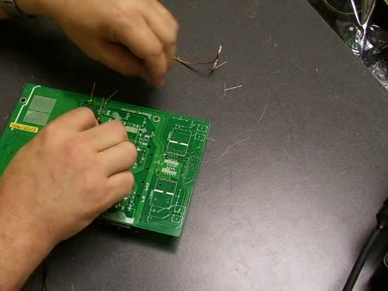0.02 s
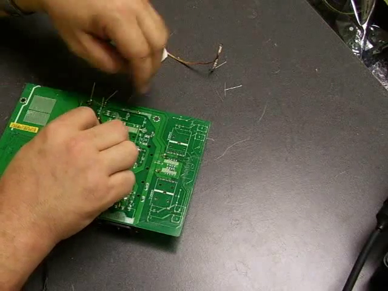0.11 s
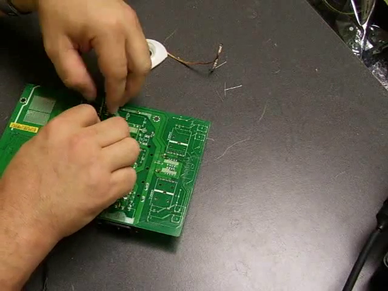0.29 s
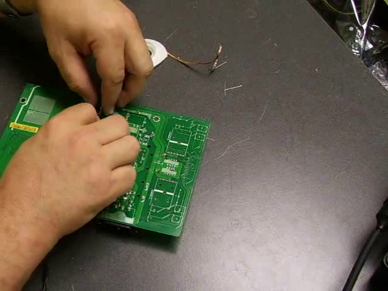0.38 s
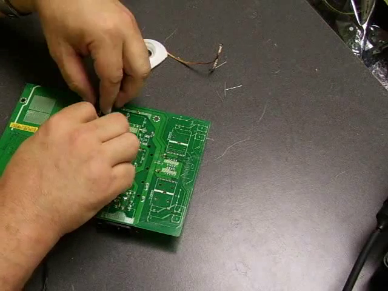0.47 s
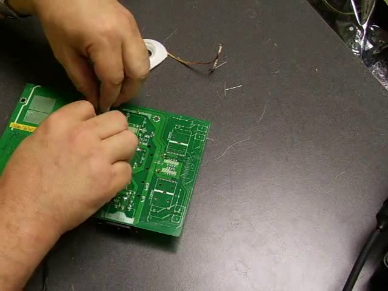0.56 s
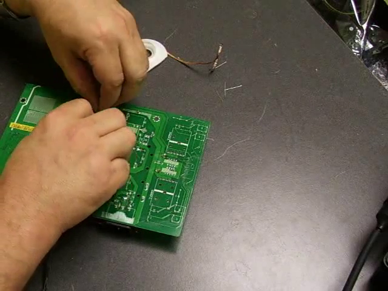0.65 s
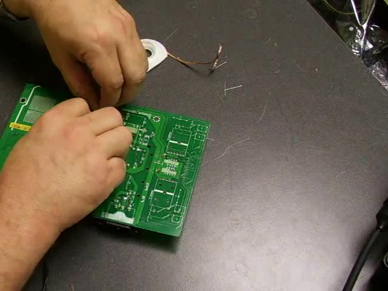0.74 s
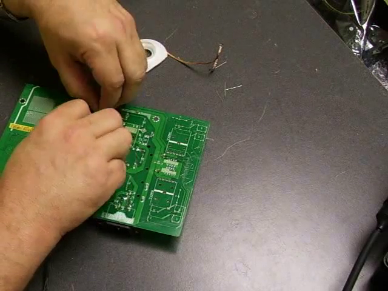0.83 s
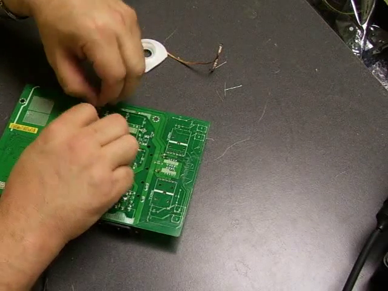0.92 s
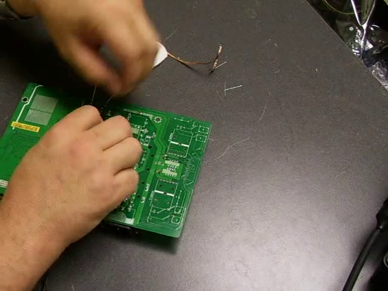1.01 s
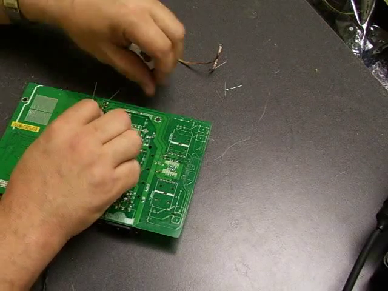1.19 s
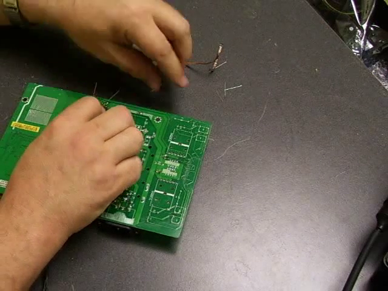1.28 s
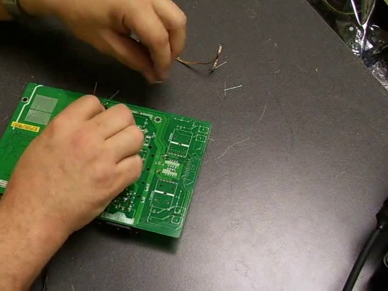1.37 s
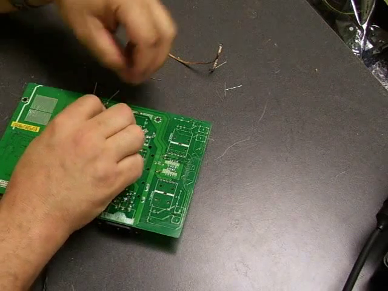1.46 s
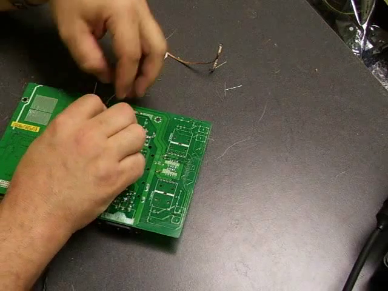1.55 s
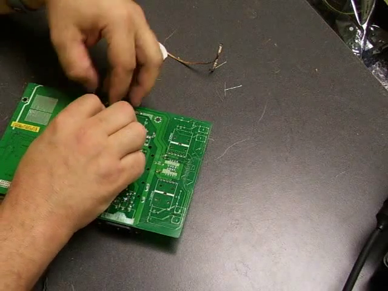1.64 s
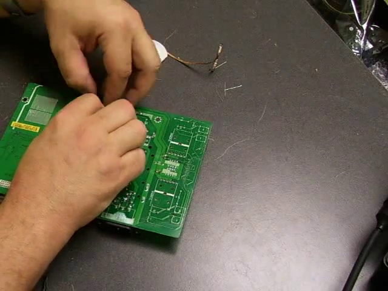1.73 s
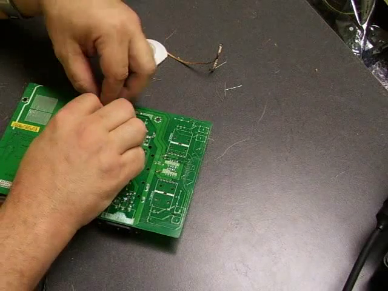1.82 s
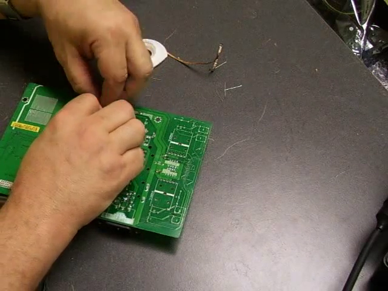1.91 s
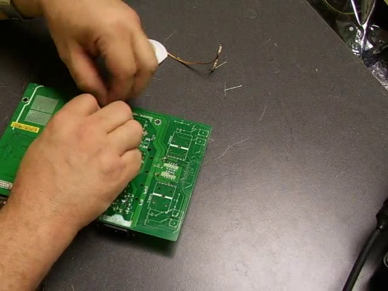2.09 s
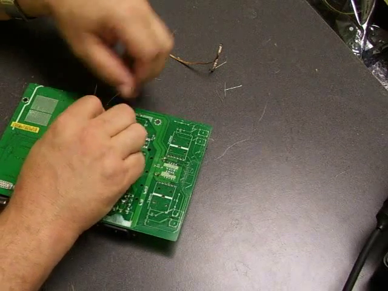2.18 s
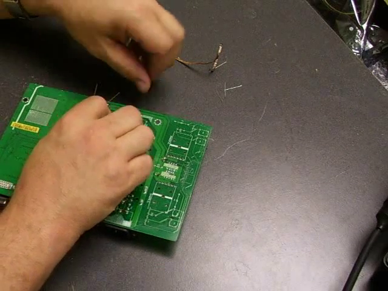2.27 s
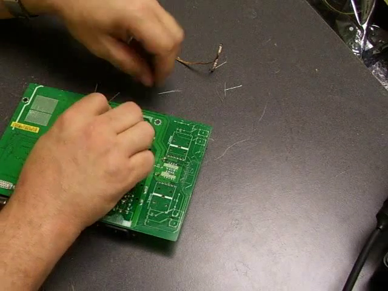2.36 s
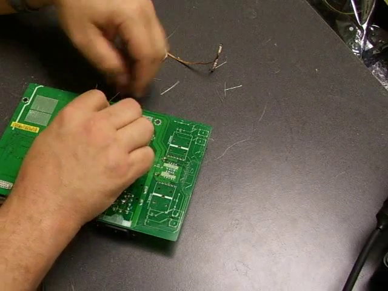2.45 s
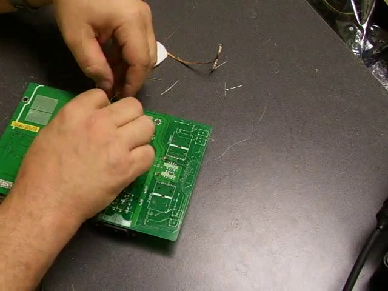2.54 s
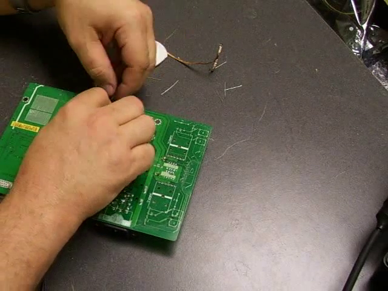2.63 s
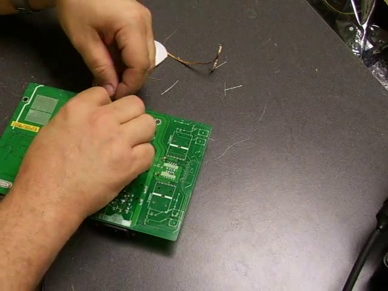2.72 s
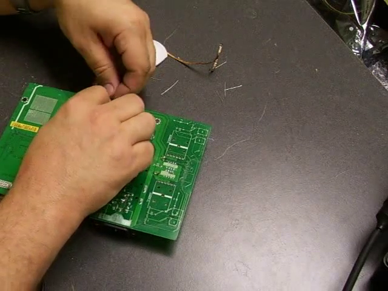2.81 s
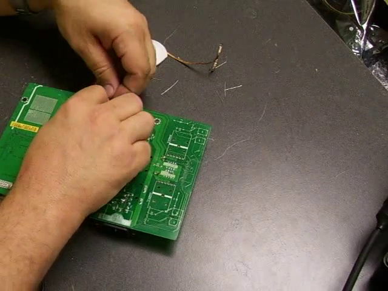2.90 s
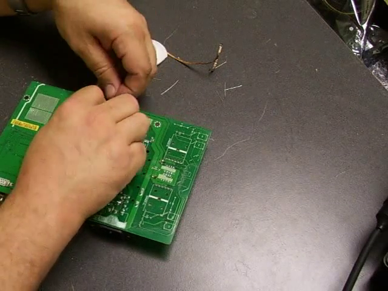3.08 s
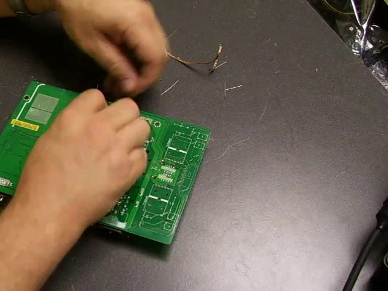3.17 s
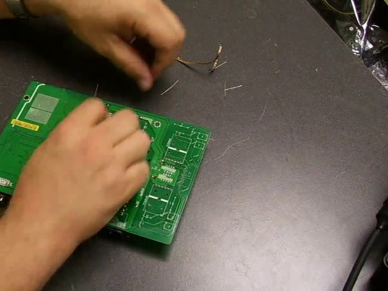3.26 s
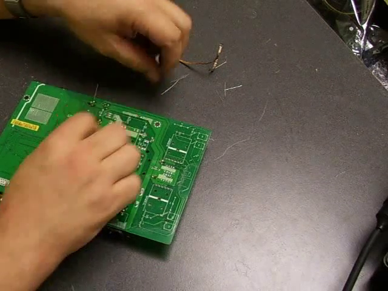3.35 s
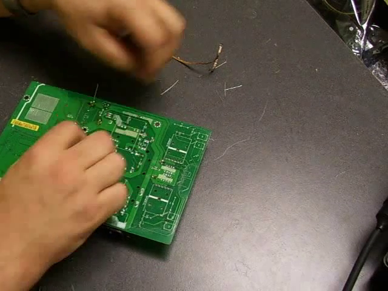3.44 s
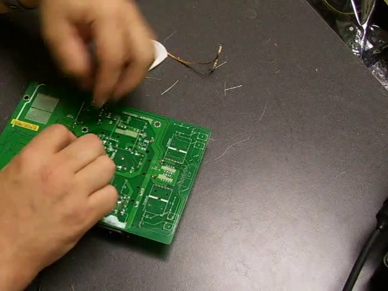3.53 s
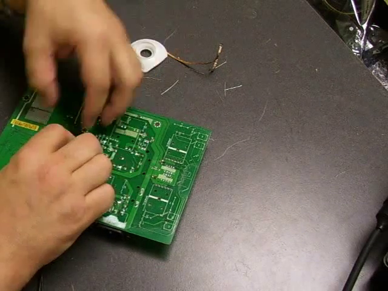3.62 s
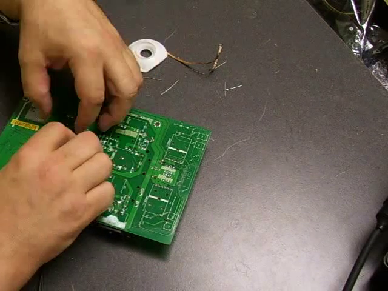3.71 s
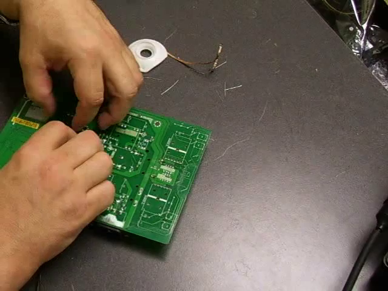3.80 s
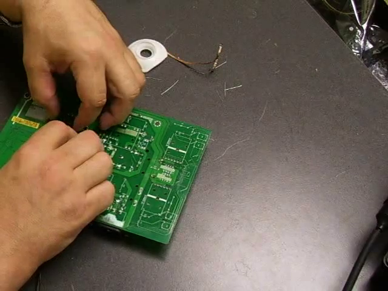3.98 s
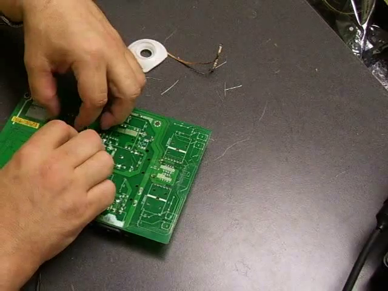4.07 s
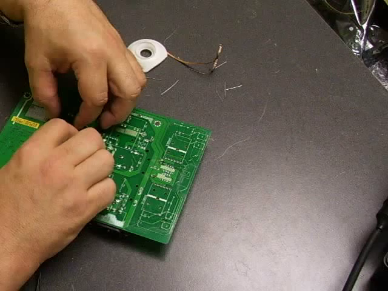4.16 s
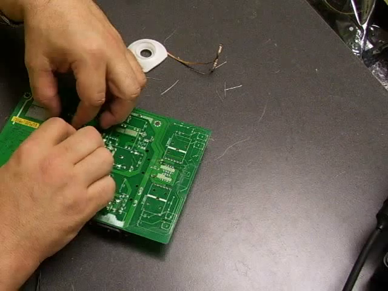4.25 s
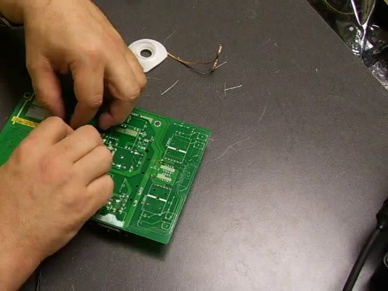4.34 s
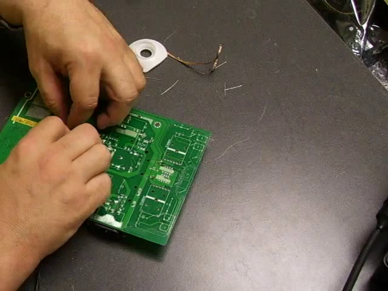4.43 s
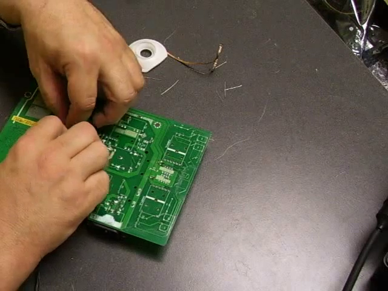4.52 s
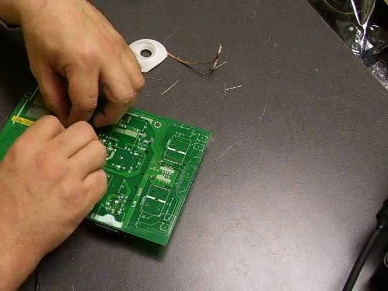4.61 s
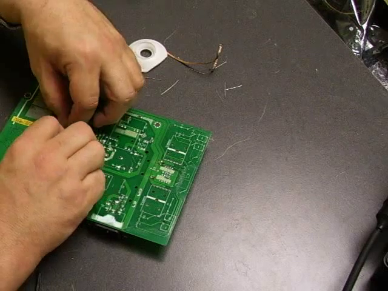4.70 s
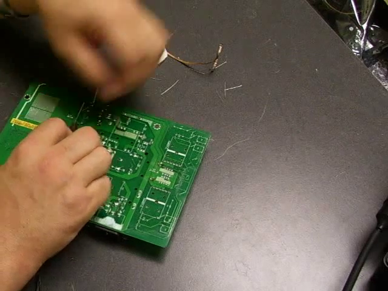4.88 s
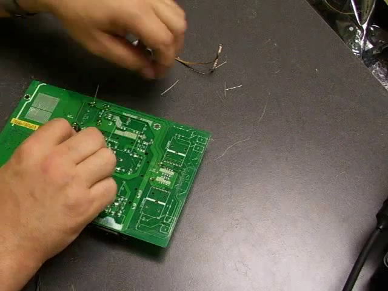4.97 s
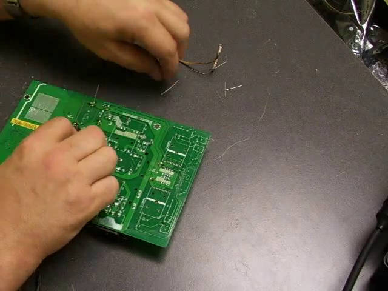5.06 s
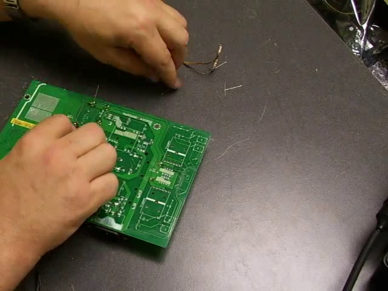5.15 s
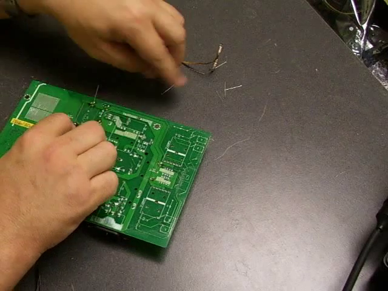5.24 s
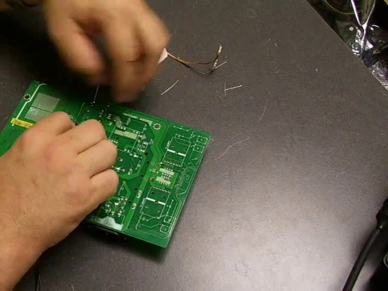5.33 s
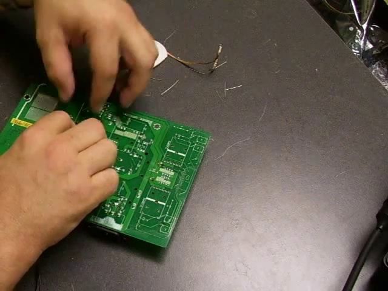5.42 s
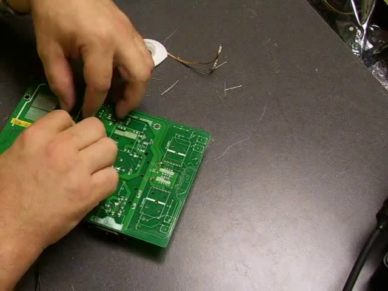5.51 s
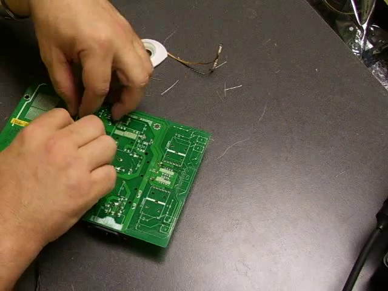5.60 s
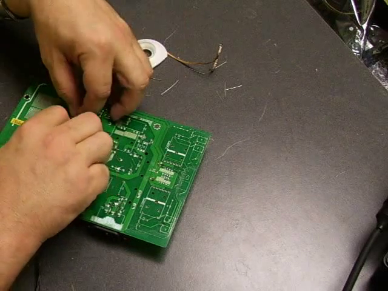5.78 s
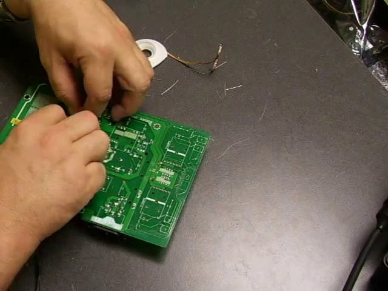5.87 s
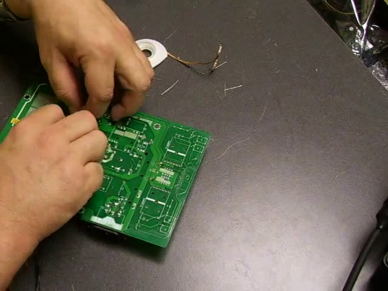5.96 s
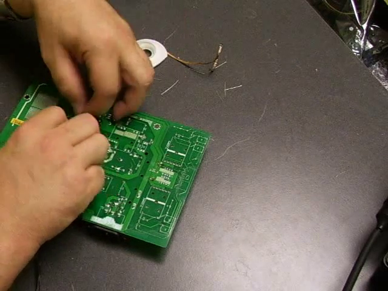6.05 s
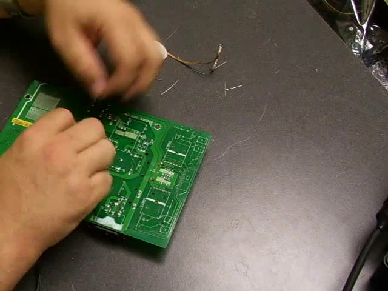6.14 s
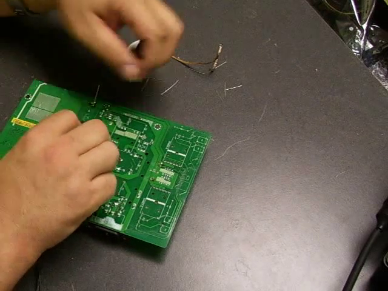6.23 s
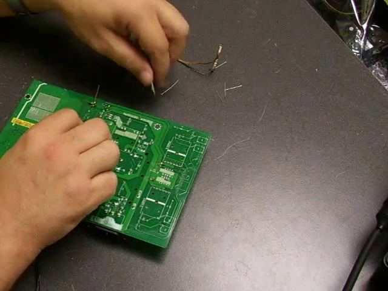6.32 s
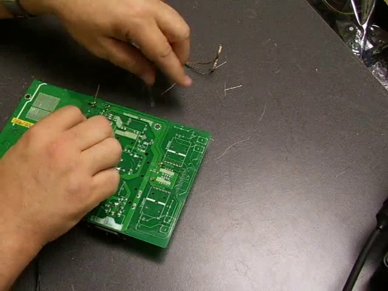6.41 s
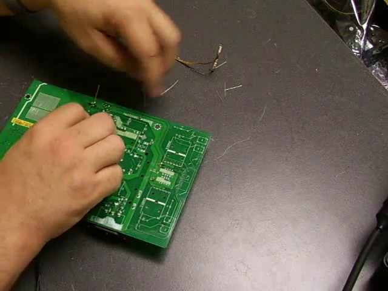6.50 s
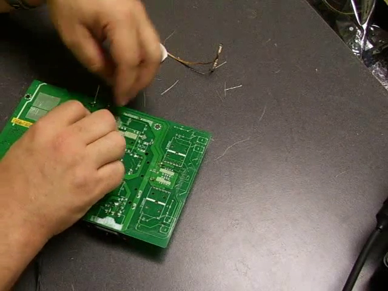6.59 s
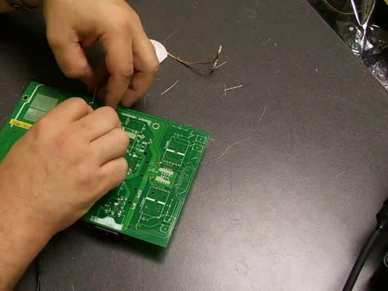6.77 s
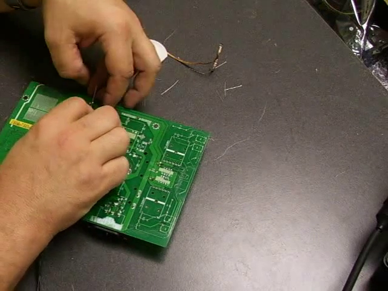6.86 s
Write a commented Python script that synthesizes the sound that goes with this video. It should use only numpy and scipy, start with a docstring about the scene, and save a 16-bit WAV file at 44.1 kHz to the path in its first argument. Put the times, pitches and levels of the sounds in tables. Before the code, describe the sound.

A quiet fan whirr with a thin motor whine opens, then a very loud snip jolts the board, and the level briefly dips before creeping back. Four more snips follow at irregular gaps, with soft clicks and little metallic taps between them. All are short and dry with slight small-room reflections, heard through a midrange-heavy microphone that distorts on the cuts.

```python
"""Snipping leads on a circuit board

Diagonal cutters snip component leads on a circuit board on a workbench. Each cut jolts the board, which rings in
its own set of pitches with a rattle and a thud; fingers and jaws tick on it in between in the same way.
Cut-off leads ping on the bench, and a fan whirrs in the small room as filtered noise and motor tones.
The microphone overloads on the cuts and passes a narrow band; the level dips after the first cut."""
import sys
import numpy as np
from scipy import signal
from scipy.fft import rfft, irfft, next_fast_len
from scipy.io import wavfile
from scipy.ndimage import map_coordinates

SR = 44100
rng = np.random.default_rng(int(sys.argv[2]) if len(sys.argv) > 2 else 0)


def to_wav(sig):
    """Store sig (one row per channel, or 1-D mono) as 16-bit WAV at the path in sys.argv[1].

    Samples outside -1..1 are clipped; the rate is SR.
    """
    pcm = np.clip(np.atleast_2d(sig), -1, 1) * 32767
    pcm = np.round(pcm).astype(np.int16)
    wavfile.write(sys.argv[1], SR, pcm.T)  # frames by channels


N = 303408  # length of the scene in samples


def amp(db):
    """Turn a level in dB into a factor to multiply a sound by."""
    return 10 ** (np.asarray(db) / 20)


def unit(x):
    """Scale x to an average (rms) strength of 1."""
    return x / np.sqrt(np.mean(x ** 2) + 1e-20)


def along(points, hz):
    """Read a curve through (pitch_hz, value) points, with pitch spaced by its logarithm."""
    point_hz, value = np.transpose(points)
    return np.interp(np.log(hz + 1), np.log(point_hz + 1), value)


def filtered(x, response):
    """Make each frequency of x stronger or weaker by response(frequency in Hz)."""
    size = next_fast_len(len(x) + 8192)
    spectrum = rfft(x, size) * response(np.fft.rfftfreq(size, 1 / SR))
    return irfft(spectrum, size)[:len(x)]


def wobble(rate):
    """A smooth random curve through `rate` random points a second."""
    points = rng.standard_normal(int(N * rate / SR) + 4)
    return map_coordinates(points, [np.arange(N) * rate / SR])


def cuts():
    """The jaws part a lead: a strong jolt to the board, with an extra push to its upper pitches."""
    # Cuts: start_s, blow_db, favoured pitch_hz, its gain_db, weight below it (dB per octave),
    # edge above it (dB per octave), second pitch_hz raised or lowered, by gain_db, ring length (factor)
    cut_list = [(0.9384, 4.5, 1568, 6.5, 4, -3, 2147, 4.5, 0.59),
                (2.2086, 3, 1356, 16.5, -1.5, 0.5, 895, -11, 0.64),
                (3.2350, 3, 2120, 2.5, -1.5, -5, 826, 4.5, 0.61),
                (4.8775, 6.5, 1567, 7, -0.5, -1, 2350, -6.5, 0.61),
                (6.1311, 4.5, 1680, 5, -0.6, -1.3, 2250, -4.5, 0.73)]
    return contacts(cut_list, held_db=5.5, gain_db=-6.0, rattle_db=13.5, rattle_t60=0.064, onset=0.0001,
                    snap=1.54, focus=0.071, spread=0.21, blur=0.064, thud_db=-21.0, room_db=-8.5)


def ticks():
    """Fingers and jaws touch the board: gentler blows to the same ringing board."""
    # Light contacts: start_s, blow_db, favoured pitch_hz, its gain_db, weight below it (dB per octave),
    # edge above it (dB per octave), ring length (factor)
    tick_list = [(1.0585, -36, 2920, 10, -4, -7, 0.63), (2.0747, -37.5, 1530, 6, -3.5, -7, .43),
                 (2.5187, -39.5, 2340, 9, -2, 1.5, 0.73), (2.6988, -22.5, 2420, 22, 3.5, -24, 0.35),
                 (2.7901, -32, 1940, 11, 6, -21, 0.66), (3.0874, -32.5, 2300, 7, -7, -9, 0.49),
                 (3.8534, -28.5, 1540, 16, 2.8, -9, 1.37), (3.919, -43.5, 1680, 8, 10.5, -3, 0.93),
                 (4.2238, -29.5, 1563, 10.5, 3, -8, 0.83), (5.471, -22.5, 1467, 6, 0, -14, 0.64),
                 (6.8438, -39, 1640, 9, 5.5, -1.5, .82), (6.8664, -42, 1570, 10, 12, 6.5, 0.98)]
    low_hz, low_db = 735, 7.5  # low pitches favoured by all ticks, and their gain
    events = [(*contact, low_hz, low_db, length) for *contact, length in tick_list]
    return contacts(events, held_db=-0.5, gain_db=1.0, rattle_db=16, rattle_t60=0.038, onset=0.00043,
                    snap=0.17, focus=0.028, spread=0.085, blur=0.032, thud_db=-22, room_db=-10.0)


def contacts(events, held_db, gain_db, rattle_db, rattle_t60, onset, snap, focus, spread, blur,
             thud_db, room_db):
    """Each contact rings the board's modes in its own colour, rattles its parts and thuds the bench; the room answers."""
    # Ways the board can ring (modes): pitch_hz, level_db, t60_s (time to fade by 60 dB, before the
    # ring length factor), rise_s (before the onset is added); low ones swell late as the bench takes up the jolt
    board = [(315, -12, 0.07, 0.0038), (533.6, 0, 0.085, 0.014), (555.6, 0.5, 0.057, 0.0067),
             (643, 0, 0.097, 0.017), (748, -12.5, 0.19, 0.0079), (844.5, -12, 0.14, 0.0025),
             (1050, -17, 0.046, 0.011), (1225, -44.5, 0.01, 0.00033), (1293, -11, 0.044, 0.0012),
             (1363, -8.5, 0.024, 0.0005), (1489, -0.5, 0.063, 0.001), (1545, -5.5, 0.073, 0.00083),
             (1677, -9.5, 0.12, 0.00048), (1846, -13, 0.055, 0.0013), (1946, -10, 0.045, 0.0012),
             (2154, -6.5, 0.076, 0.00025), (2280, -6.5, 0.039, 0.0006), (2343, -12.5, 0.062, 0.0012),
             (2504, -8.5, 0.045, 0.0012), (2743, -15.5, 0.051, 0.00037), (2870, -8, 0.045, 0.0006),
             (3240, -27.5, 0.16, .0005), (3480, -26.5, 0.061, 0.00084), (3784, -16.5, 0.072, 0.00028),
             (4210, -22.5, .07, .0005)]
    # Colour of the jolt noise: pitch_hz, level_db (per Hz, before the tilt)
    rattle_colour = [(30, -20.5), (200, -19.5), (600, -0.5), (1500, -5), (2500, -4.5), (3500, -11.5),
                     (4500, -9.5), (5500, -8)]
    low_end_hz, high_end_hz = 550, 4200  # the colour tilts between these and the favoured pitch
    out = np.zeros(N + SR)
    t = np.arange(SR // 4) / SR
    hz, level_db, t60, rise = np.transpose(board)[:, :, None]
    # neighbours start opposed, so close low pairs beat up after the blow
    sign = (-1.) ** np.arange(len(hz))[:, None]

    def bump(centre_hz, width):
        return np.exp(-(np.log(hz / centre_hz) / width) ** 2)

    for start_s, blow_db, best_hz, best_db, weight, edge, second_hz, second_db, length in events:
        tilt = [(low_end_hz, weight * np.log2(best_hz / low_end_hz)),
                (best_hz, 0),
                (high_end_hz, edge * np.log2(high_end_hz / best_hz))]
        # modes with a crest at the contact point ring louder; those near the second pitch change by second_db
        colour_db = best_db * bump(best_hz, focus) + second_db * bump(second_hz, spread)
        colour_db = colour_db + held_db * bump(564, 0.15)  # low modes raised or lowered at every contact
        chance_db = 0.81 * rng.standard_normal(hz.shape)
        strength = amp(level_db + colour_db + along(tilt, hz) + chance_db)

        # loose parts blur the pitch
        drift = np.cumsum(rng.standard_normal((len(hz), len(t))), axis=1) * blur * np.sqrt(hz / 1500)
        phase = 2 * np.pi * hz * t + drift + hz / 1500 * rng.standard_normal(hz.shape)
        swell = (1 - np.exp(-t / (np.abs(rise) + onset))) ** 2
        # the upper modes get an extra push for a few ms; in a cut, the parting lead drives them
        swell = swell * (1 + snap * (hz > 1150) * np.exp(-(t / 0.0063) ** 2))
        fade = amp(-60 * t / (t60 * length))
        ring = np.sum(sign * strength * swell * fade * np.sin(phase), axis=0)

        noise = filtered(rng.standard_normal(len(t)), lambda f: amp(along(rattle_colour, f) + along(tilt, f)))
        rattle_rise = 1 - np.exp(-t / (0.00097 + onset))
        rattle = amp(rattle_db - 60 * t / (rattle_t60 * length)) * rattle_rise * noise
        thud = amp(thud_db - 60 * t / 0.034) * np.sin(2 * np.pi * 140 * t)
        add_in_room(out, amp(blow_db + gain_db) * (ring + rattle + thud), start_s, room_db)
    return out[:N]


def drops(blur, tick_db, tick_t60, room_db):
    """A lead landing on the bench pings in its few modes over a small tick of noise."""
    # Modes of a cut-off lead: pitch_hz, level_db, t60_s (time to fade by 60 dB), rise_s
    lead = [(1510, -6, .035, 0.0021), (2380, 0, 0.05, 0.0018), (3210, -5.5, 0.024, 0.00086),
            (4670, -7, 0.024, 0.0011)]
    # Leads landing on the bench: start_s, level_db, brightness (dB per octave)
    drop_list = [(0.511, -37.5, 5), (1.1735, -26, -7), (1.4405, -31.5, -1), (1.522, -39.5, 7),
                 (6.3065, -24.5, -8.5), (6.5960, -35, 9)]
    # Noise of a lead touching down: pitch_hz, level_db (per Hz, relative)
    scratch = [(1200, -29), (2000, 8), (2600, 5), (3600, -7), (5000, -7)]
    out = np.zeros(N + SR)
    t = np.arange(SR // 8) / SR
    hz, level_db, t60, rise = np.transpose(lead)[:, :, None]
    for start_s, drop_db, bright in drop_list:
        drift = blur * np.cumsum(rng.standard_normal((len(hz), len(t))), axis=1)
        chance_db = 1.8 * rng.standard_normal(hz.shape)
        strength = amp(level_db + bright * np.log2(hz / hz[1]) + chance_db)
        shape = (1 - np.exp(-t / rise)) ** 2 * amp(-60 * t / t60)
        ping = np.sum(strength * shape * np.sin(2 * np.pi * hz * t + drift), axis=0)

        noise = unit(filtered(rng.standard_normal(len(t)), lambda f: amp(along(scratch, f))))
        tick = amp(tick_db - 60 * t / tick_t60) * (1 - np.exp(-t / rise[-1])) * noise
        add_in_room(out, amp(drop_db) * (ping + tick), start_s, room_db)
    return out[:N]


def add_in_room(out, dry, start_s, room_db):
    """Add a sound to out at its start time, along with the room's answer to it."""
    wet = signal.fftconvolve(np.pad(dry, (260, 0)), room_tail())  # first wall 6 ms away
    start = round(start_s * SR)
    out[start:start + len(dry)] += dry
    out[start:start + len(wet)] += amp(room_db) * wet


def room_tail():
    """Echoes of a small room: noise in which each frequency dies at its own speed, total energy 1."""
    # How long the room rings: pitch_hz, t60_s (time to fade by 60 dB)
    room = [(100, .12), (500, 0.13), (1500, 0.092), (3000, 0.11), (5000, 0.16)]
    hz, t, grid = signal.stft(rng.standard_normal(SR // 3), SR, nperseg=256)
    fade = amp(-60 * t / along(room, hz)[:, None])
    tail = signal.istft(grid * fade, SR, nperseg=256)[1]
    return tail / np.linalg.norm(tail)


def fan(rush_db, flutter_db, whine_db):
    """Air rush with slight flutter, narrow noise where the housing sings, and unsteady tones on shaft multiples."""
    # Colour of the air rush: pitch_hz, level_db (per Hz, relative)
    air = [(15, -37), (58, 0), (112, -3.5), (170, -5.5), (300, -4), (480, -7.5), (750, -4), (1080, -9.5),
           (1200, -14), (1450, -14), (1700, -17), (2050, -16), (3600, -24.5), (3900, -28.5), (5500, -22)]
    # Pitches where the housing sings: pitch_hz, width_hz, level_db
    housing = [(114.4, 40, -51.5), (480.2, 14, -56), (818, 13, -62.5), (966.6, 76, -54)]
    # Motor whine: multiple of the shaft speed, level_db (middle of its wobble)
    whine = [(14, -51.5), (15, -66), (18, -64), (20, -57.5), (21, -58), (22, -63.5), (28, -62.5)]
    shaft_hz = 70.08  # middle of the motor's slightly wandering speed
    rush = unit(filtered(rng.standard_normal(N), lambda f: amp(along(air, f))))
    out = amp(rush_db + flutter_db * wobble(5.5) + 1.2 * wobble(0.69)) * rush
    for hz, width, level_db in housing:
        noise = filtered(rng.standard_normal(N), lambda f: 1 / (1 + ((f - hz) / width * 2) ** 2))
        out += amp(level_db) * unit(noise)
    turns = np.cumsum(shaft_hz * (1 + 0.0015 * wobble(3))) / SR
    for multiple, level_db in whine:
        strength = amp(level_db + whine_db * wobble(9))
        tone = np.sin(2 * np.pi * (round(multiple) * turns + rng.random()))
        out += np.sqrt(2) * strength * tone  # sqrt(2) brings a sine to rms 1
    return out


def scene():
    """Cuts, ticks, dropped leads and fan together at the microphone."""
    leads = drops(blur=0.06, tick_db=-3.5, tick_t60=0.036, room_db=-12)
    return (cuts() + ticks() + leads + fan(rush_db=-41, flutter_db=0.2, whine_db=2.0))[None]


def level_dip():
    """The level falls fast after the first cut and creeps back ever more slowly."""
    steady_db, dip_db = -0.24, -14.5
    start_s, fall_s, half_return_s = 0.95, 0.0079, 0.093
    since = np.arange(N) / SR - start_s
    fall = np.clip(since / fall_s, 0, 1)
    recovery = 1 + np.clip(since - fall_s, 0, None) / half_return_s
    return amp(steady_db + dip_db * fall / recovery)


def record(dry):
    """The capsule saturates before the narrow band; a later stage trims the last peaks, which adds some treble."""
    # Upper edge of the microphone's narrow band: pitch_hz, gain_db
    band_edge = [(3500, 0.8), (3900, -6.5), (4400, -12), (4800, -24.5), (5200, -38.5), (5600, -82)]
    top = 1.043  # the capsule rounds peaks off towards this height
    saturated = dry[0] / (1 + np.abs(dry[0] / top) ** 6) ** (1 / 6)
    narrow = filtered(saturated, lambda hz: amp(along(band_edge, hz)))
    loud = narrow * level_dip()
    hiss = amp(-96) * rng.standard_normal(N)  # faint converter hiss
    clipped = np.clip(loud, -0.995, 0.995) + hiss
    # gentle roll-off near 17.5 kHz, nothing from 19.3 kHz up
    return filtered(clipped, lambda hz: 1 / (1 + (hz / 17500) ** 12) * (hz < 19300))[None]


dry = scene()
out = record(dry)
to_wav(out)
```